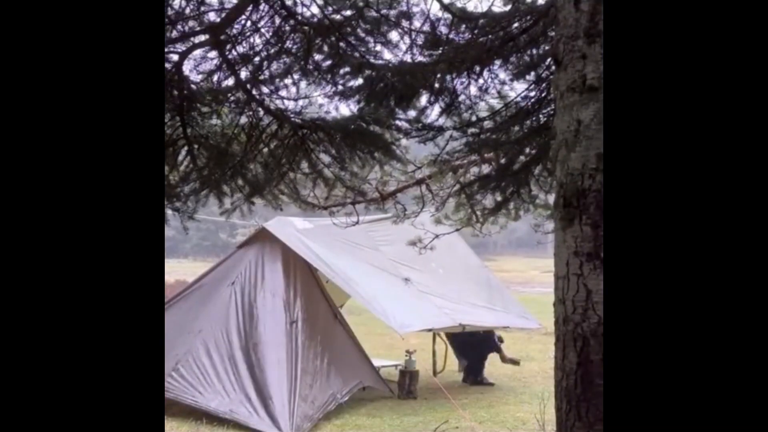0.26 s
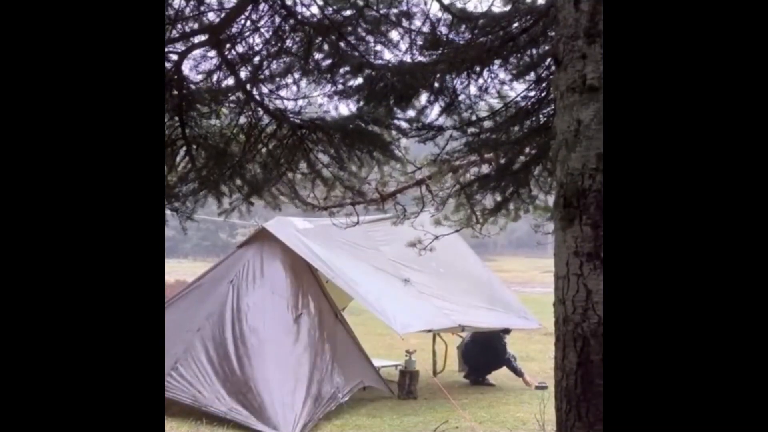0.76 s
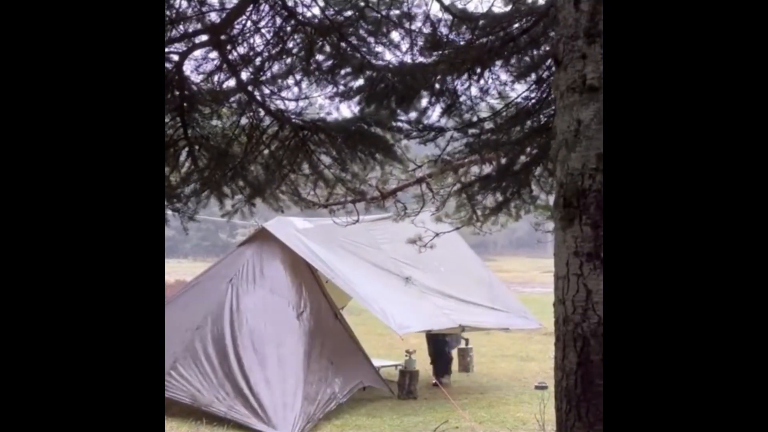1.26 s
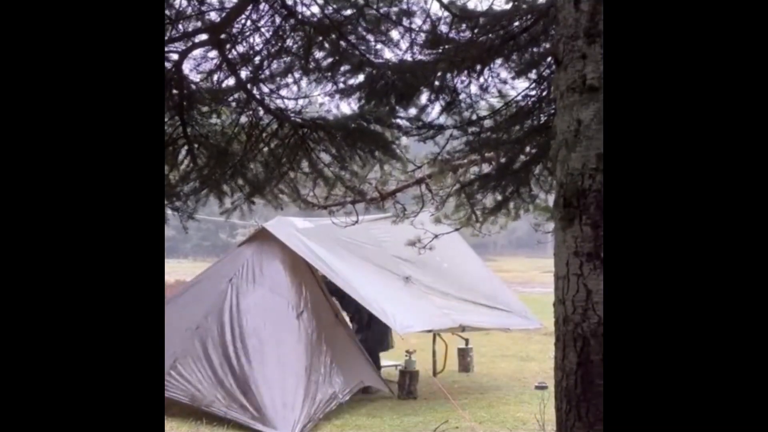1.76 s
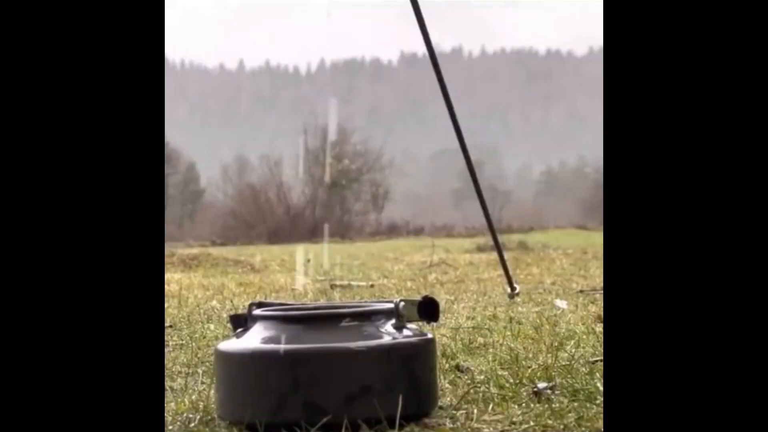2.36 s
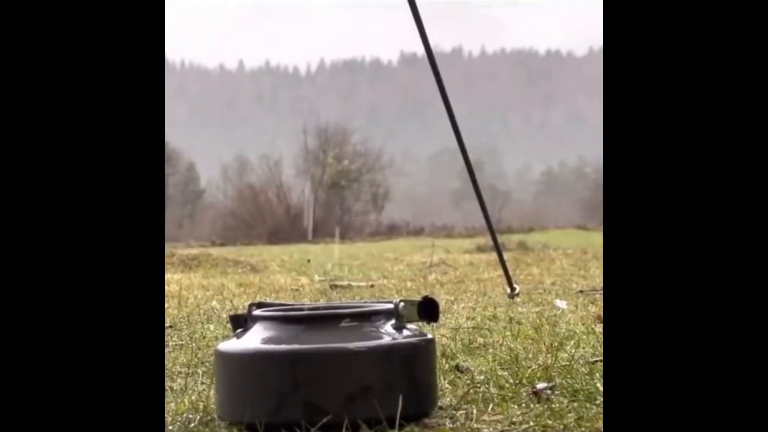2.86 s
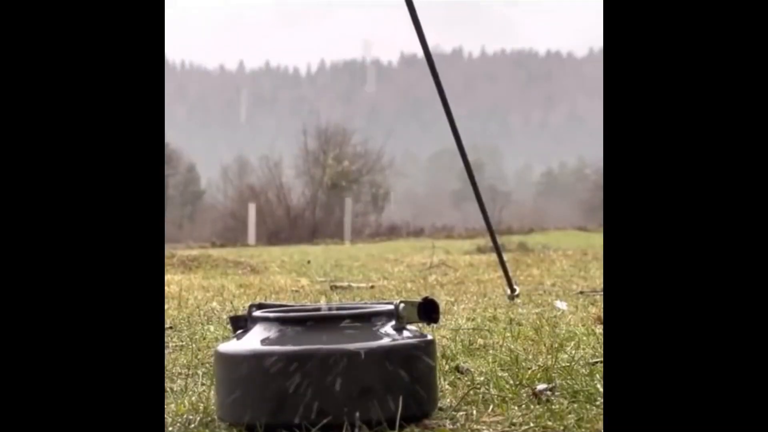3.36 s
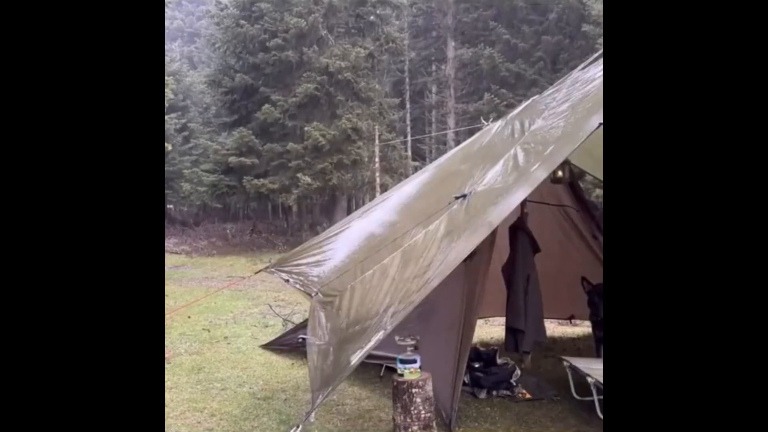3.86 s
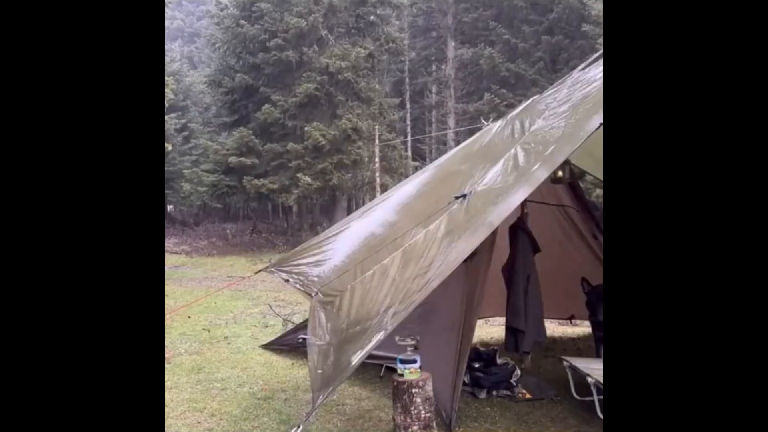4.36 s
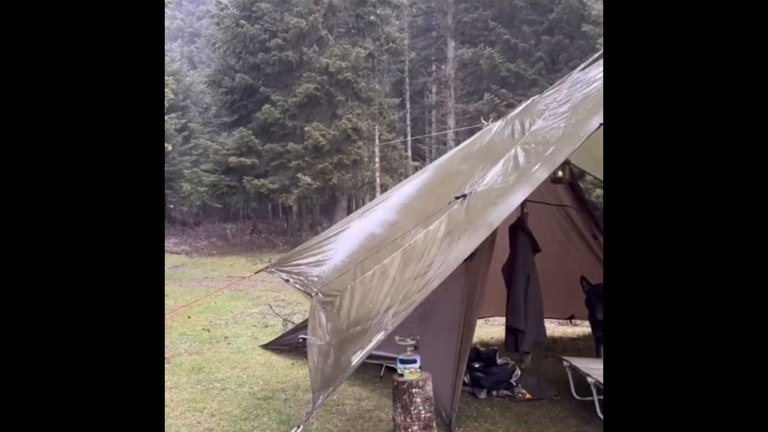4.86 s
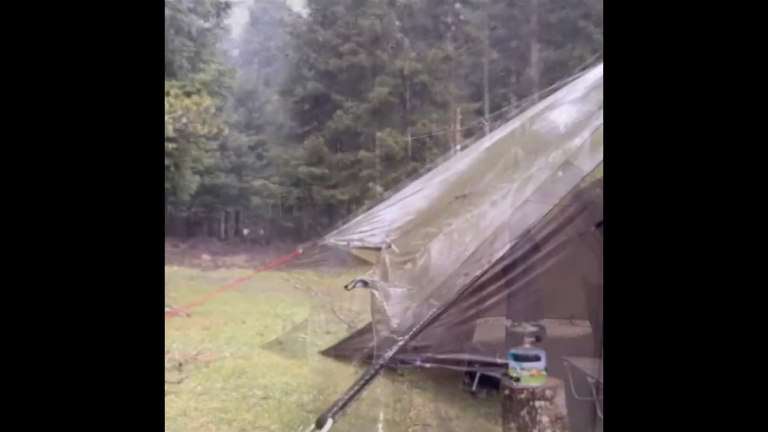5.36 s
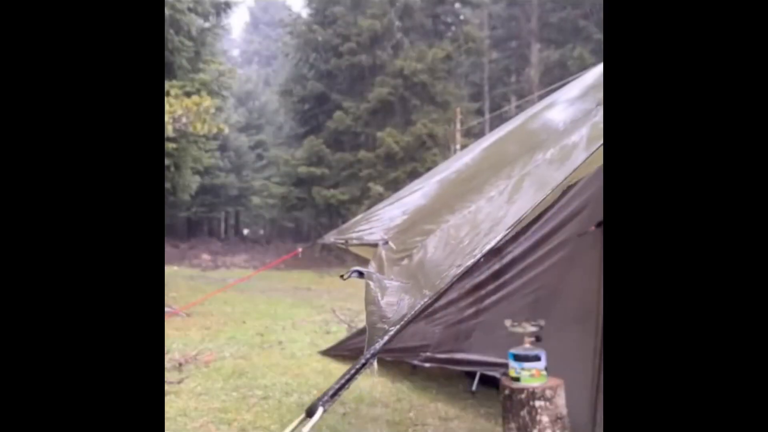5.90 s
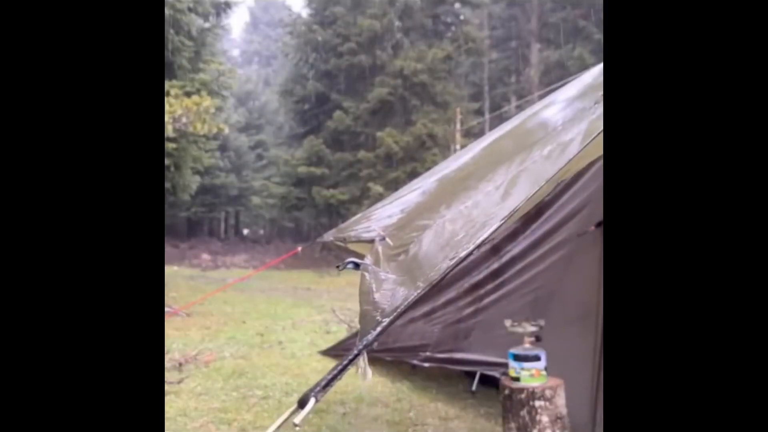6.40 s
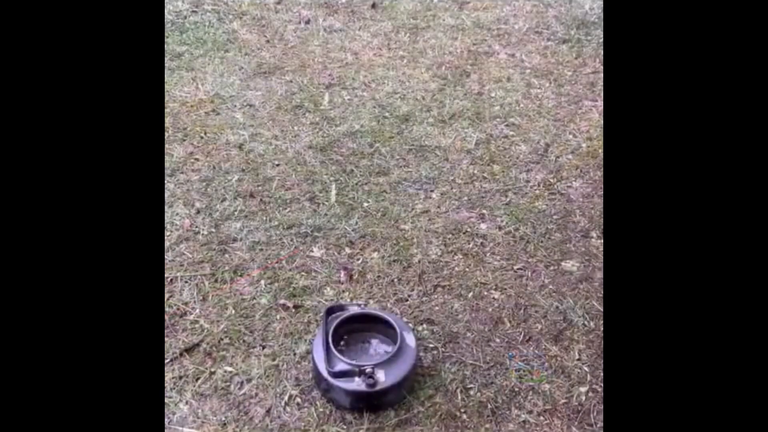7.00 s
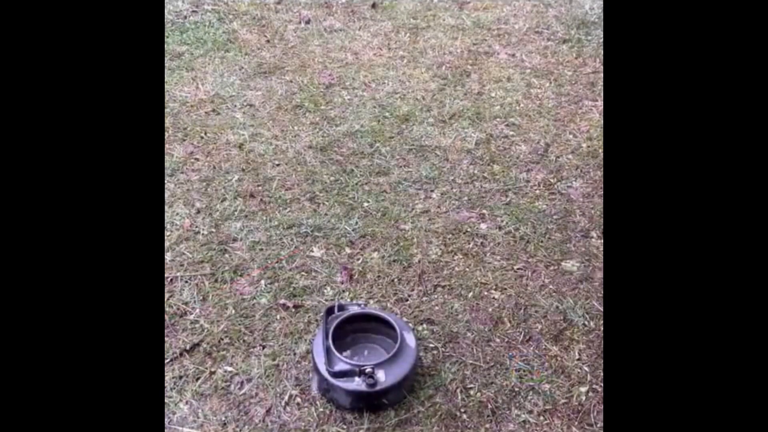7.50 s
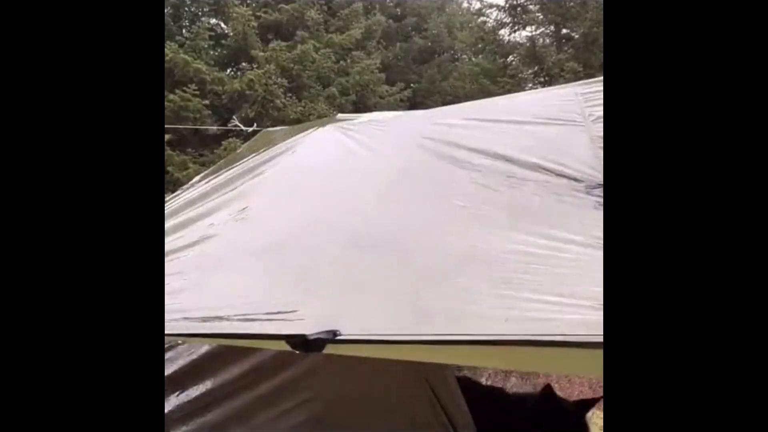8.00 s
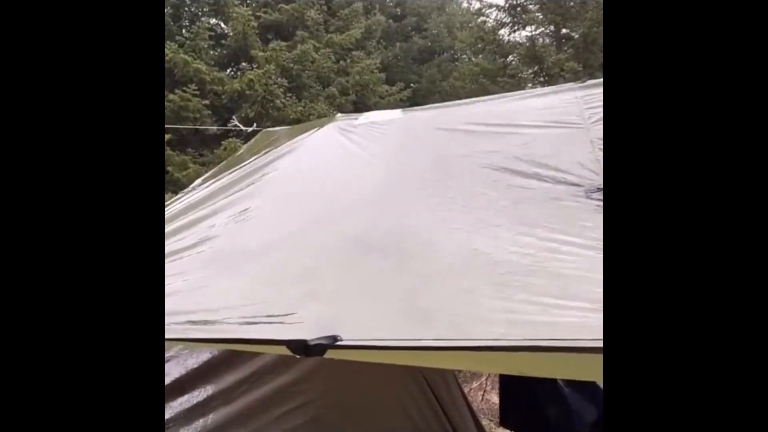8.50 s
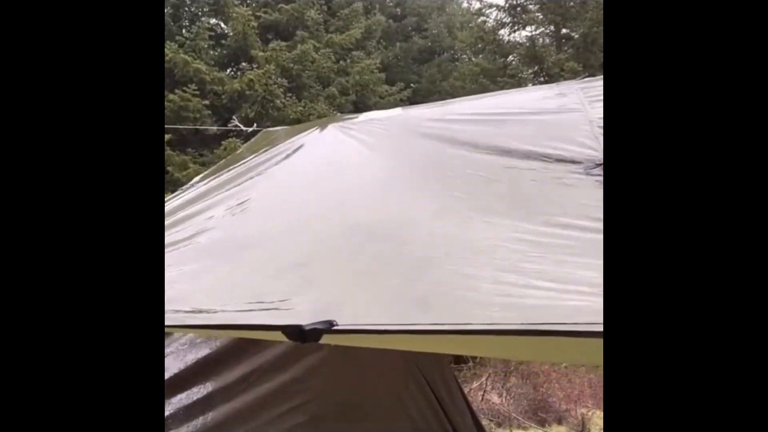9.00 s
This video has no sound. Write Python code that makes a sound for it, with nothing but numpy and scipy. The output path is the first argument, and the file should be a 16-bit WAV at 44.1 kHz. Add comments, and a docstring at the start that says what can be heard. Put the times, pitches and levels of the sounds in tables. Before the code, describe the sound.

Continuous rain in a forest clearing, heard from successive close positions. It starts faint with rapid tiny watery drips, dips further, then blends into brighter rain with short high pings and spits on a kettle. Wide pattering and drumming on a sloping tarp carry snapping big drops and soft thumps, followed by grassy patter, then duller roof drumming with a quick swelling flutter of cloth.

```python
"""Steady rain on a tarp shelter in a forest clearing, heard from one spot after another.
Fine drops hiss and patter, heavier ones drum on the cloth: filtered random clicks over noise.
Big drops snap and tick close by, run-off plinks and spits on a metal kettle: decaying sines and noise.
A thin trickle rings a small hollow early on; later the cloth thumps, and near the end the tarp flaps.
"""
import sys
import numpy as np
from scipy import signal
from scipy.fft import rfft, irfft
from scipy.io import wavfile

SR = 44100
rng = np.random.default_rng(int(sys.argv[2]) if len(sys.argv) > 2 else 0)


def inscribe(sig):
    """Save sig as 16-bit PCM at rate SR to the path in sys.argv[1].

    A 1-D sig is mono; a 2-D sig holds one channel per row.
    Samples are clipped to [-1, 1] before scaling.
    """
    pcm = np.round(np.clip(np.atleast_2d(sig).T, -1, 1) * 32767)
    wavfile.write(sys.argv[1], SR, pcm.astype(np.int16))


N = 407819
TIME = np.arange(N) / SR

# Rain spectrum at each listening spot. Each row: frequency in Hz, relative density in dB per Hz.
TREE = [(35, -57), (60, -37), (188, -18.5), (337, -1), (467, -3.5), (694, -3.5), (2330, -2.5), (3160, -3),
        (4280, -2.5), (5400, -4.5), (9460, -4), (15800, -9.5)]
LULL = [(35, -68.5), (60, -48), (238, -12), (406, -2), (762, -6), (837, -3), (985, -4.5), (1240, -5),
        (1330, -5.5), (6360, -4), (10100, -3), (15800, -5.5)]
KETTLE = [(35, -59), (60, -30), (156, -32), (216, -19.5), (337, -9), (416, -5), (762, -2.5), (897, -3.5),
          (1850, -2.5), (3390, -5), (4490, -7), (5530, -11.5), (9460, -5.5), (14100, -12.5), (15800, -30)]
SLOPE = [(35, -62), (60, -28), (130, -26.5), (243, -11.5), (361, -4.5), (436, -4.5), (550, 0.5),
         (1030, -1.5), (1300, -4), (1940, -0.5), (2750, -3), (3470, -4.5), (6220, -1.5), (11700, -6.5),
         (15800, -13)]
CORNER = [(35, -54), (60, -25.5), (136, -24), (193, -12.5), (397, -2.5), (817, -5), (1220, 0), (2280, -2),
          (2750, -2), (5160, -2.5), (5800, -0.5), (6360, -2.5), (9680, -3.5), (12800, -8.5), (15800, -8.5)]
GRASS = [(35, -60), (60, -46.5), (175, -22.5), (388, -0.5), (678, -5), (940, -2), (1030, -2.5),
         (1460, -2.5), (2130, -6), (2620, -4), (3550, -8), (5660, -3.5), (13700, -8.5), (14700, -11),
         (15800, -8.5)]
ROOF = [(35, -43), (60, -31), (146, -17), (345, 4), (467, 1), (525, 2.5), (762, -4), (877, -6.5),
        (1720, -2.5), (2230, -6), (2620, -4), (4920, -5), (5660, -4), (11400, -8), (15800, -16.5)]
# Stereo width of the rain. Each row: frequency in Hz, side minus mid in dB.
NARROW = [(60, -5), (99, -9), (160, -17), (270, -16), (450, -16), (740, -18), (1220, -39), (2010, -34),
          (3330, -11), (5500, -9.5), (9080, -0.5), (15000, -22)]
OPEN = [(60, -5), (99, -7), (160, -9), (270, -17), (450, -17.5), (740, -16.5), (1220, -19), (2010, -13),
        (3330, -1.5), (5500, -3), (9080, -2), (15000, -1.5)]
WIDE = [(60, -1), (99, -2), (160, -2), (270, -2), (450, -2.5), (740, -8), (1220, -16.5), (2010, -12),
        (3330, -3.5), (5500, -3), (9080, -2), (15000, -0.5)]
CLOSE = [(60, -15), (99, -16), (160, -20), (270, -48), (450, -31), (740, -22), (1220, -15), (2010, -8.5),
         (3330, -5), (5500, -3.5), (9080, -2), (15000, -12)]
# Stretches of steady rain, one spot each. Each row: start in seconds, blend in seconds, dip in the blend
# in dB (below 0 counts as 0), relative patter level in dB, relative drumming level in dB, trend in dB per
# second, spectrum, stereo width, drops per second, spread of drop sizes in dB, hiss against drops in dB,
# heavy drops per second.
SPOTS = [(0, 0.0092, -3, -55, -66, 3.5, TREE, NARROW, 1400, 4.5, 5, 540),
         (1.11, 0.059, 1, -59.5, -76.5, 0, LULL, NARROW, 1400, 6.5, 7.5, 500),
         (1.52, 0.079, 0, -56, -68, -0.5, LULL, NARROW, 2100, 4.5, 2, 520),
         (2.13, .2, 2.5, -45, -59, 0.5, KETTLE, CLOSE, 3800, 2.5, 3, 1200),
         (3.59, .2, 3.5, -43.5, -59.5, 0.5, SLOPE, OPEN, 2600, 3.5, 4, 1250),
         (5.2, .24, 3.5, -41, -55.5, 1.8, CORNER, WIDE, 2500, 3, 3, 450),
         (6.71, .28, 4.5, -45, -57.5, 2.5, GRASS, OPEN, 2100, 4.5, 3.5, 980),
         (7.61, .2, 4.5, -45, -57.5, -3, ROOF, WIDE, 3400, 4.5, 3.5, 520),
         (8.86, 0.088, -3.5, -51, -62, -5, ROOF, WIDE, 2270, 3.5, 3, 500),
         (9.08, .12, 2, -46, -49.5, -2, ROOF, WIDE, 2000, 5, 2.5, 710)]
# Brief swells and dips of the rain. Each row: middle in seconds, time from the middle to 1/e of the change
# in seconds, patter change in dB, drumming change in dB.
SWELLS_AND_DIPS = [(0.783, .1, 2, 3), (0.971, 0.021, 5.5, 5), (1.067, .025, 1.5, 2.5),
                   (1.698, 0.022, 0.5, 5), (2.546, 0.25, 2.5, 2), (5.697, 0.54, 0.5, 2.5),
                   (6.12, 0.19, 0, -0.5), (7.684, 0.048, -3, 2), (7.854, 0.034, 1.5, -1.5)]
# Resonances that tint the rain. Each row: start in seconds, end in seconds, frequency in Hz, width in Hz,
# peak gain in dB.
TINTS = [(2.095, 3.59, 342, 13, 10.5), (3.604, 5.187, 365, 23, 9.5), (2.1, 3.6, 5600, 670, 1),
         (2.1, 3.6, 9600, 4100, 2.5), (3.6, 6.7, 2820, 280, 2.5), (3.6, 5.2, 1300, 100, -0.5),
         (3.6, 5.2, 4100, 650, 2.5), (5.2, 9.25, 5700, 250, 2), (5.2, 9.25, 4280, 330, 3),
         (6.7, 9.25, 2800, 500, 0.5), (7.074, 7.142, 930, 200, 6.5)]
# Big drops close by. Each row: time in seconds, relative level in dB, pitch in Hz, splash T60 in seconds.
TAPS = [(0.569, -47, 2900, 0.0073), (0.738, -33, 2400, 0.011), (.797, -39, 1130, .006),
        (.814, -35, 2290, .007), (.863, -41, 1950, .006), (.933, -34.5, 1760, .008),
        (.9564, -33, 1500, .008), (0.974, -28, 3920, .013), (.9834, -30.5, 4300, 0.011),
        (1.018, -35.5, 2260, .006), (1.05, -32, 1480, 0.0077), (1.053, -32, 2300, .008),
        (1.063, -39, 3400, .007), (1.074, -34, 4370, .007), (1.078, -29, 5500, 0.0092),
        (1.197, -34.5, 9000, 0.01), (1.247, -40, 5000, .007), (1.295, -40, 9000, .007),
        (1.47, -39, 9000, .006), (1.49, -37.5, 2940, .012), (1.658, -36, 7000, .009),
        (1.6885, -32.5, 3230, .013), (1.709, -37, 9000, 0.0065), (2.222, -25, 13500, .008),
        (2.424, -27, 9170, .008), (3.6656, -25, 5040, .007), (4.096, -21.5, 1770, 0.012),
        (4.248, -22, 2160, 0.0089), (4.4807, -25, 4830, .006), (4.5026, -26, 2230, .008),
        (4.5426, -27, 4460, .006), (4.697, -21, 4170, 0.0097), (4.7332, -25, 2120, .007),
        (4.774, -26, 2840, .008), (4.847, -20, 2640, 0.0089), (4.873, -28, 1900, .007),
        (4.902, -23.5, 2670, 0.01), (4.9367, -31, 2700, .007), (4.9922, -25, 5130, 0.0095),
        (5.032, -29, 1400, .007), (5.091, -23, 3040, .007), (5.119, -24, 2050, .006),
        (5.179, -31, 2850, .006), (5.317, -26, 1700, .008), (5.352, -21, 4000, .007),
        (5.394, -20, 5780, .008), (5.84, -19, 6000, .005), (5.922, -24, 10000, .012),
        (5.967, -24, 2400, .007), (6.029, -18.5, 2840, 0.0088), (6.0916, -19.5, 1700, 0.011),
        (6.301, -24, 2800, .008), (6.3505, -26, 4170, .007), (6.399, -23, 6010, .006),
        (6.5814, -28.5, 1280, .008), (7.002, -27, 4320, .007), (7.062, -23.5, 2310, 0.0088),
        (7.2685, -25, 1900, 0.0076), (7.302, -34, 14000, .008), (7.352, -23.5, 1210, 0.017),
        (7.451, -26.5, 1800, 0.018), (7.532, -25.5, 13030, 0.01), (7.645, -24, 2900, 0.01),
        (7.6473, -28, 5000, .01), (7.7005, -26, 4200, .01), (7.993, -23.5, 2100, 0.015),
        (8.020, -26, 1500, .012), (8.1385, -25, 5840, .007), (8.192, -22, 5920, 0.0078),
        (8.266, -33, 5670, .007), (9.135, -30, 3800, .012), (9.142, -35, 1500, .014),
        (9.198, -31, 2400, .01)]
# Run-off on the kettle. Each row: time in seconds, relative level in dB, pitch in Hz, T60 in seconds.
PLINKS = [(2.095, -31, 4670, 0.012), (2.152, -39, 4900, .012), (2.16, -40, 4750, .014),
          (2.1916, -38, 4500, .008), (2.212, -35, 4350, .008), (2.2205, -36, 4700, .01),
          (2.23, -32, 4650, .01), (2.248, -29, 5200, 0.011), (2.288, -37, 4600, .014),
          (2.297, -36, 5000, .012), (2.3067, -28, 4140, .007), (2.314, -39, 5150, .016),
          (2.37, -33, 4150, .01), (2.472, -25.5, 3980, 0.024), (2.483, -34, 4650, .016),
          (2.504, -33, 4400, .008), (2.514, -33, 4600, .009), (2.5287, -30, 3980, .008),
          (2.545, -25, 4500, .011), (2.56, -25, 4500, .012), (2.568, -31, 4400, .012),
          (2.579, -24, 4150, .009), (2.581, -37, 4800, .01), (2.629, -31, 3940, .008),
          (2.63, -29, 4700, 0.012), (2.6835, -36, 4250, .01), (2.7113, -19.5, 4550, 0.0095),
          (2.7114, -30, 6100, .012), (2.7373, -34, 4720, 0.022), (2.775, -26, 4050, .006),
          (2.8072, -37, 4730, .014), (2.947, -43, 4730, .016), (3.0377, -32, 4300, .008),
          (3.129, -33, 4700, 0.016), (3.1488, -27, 4680, .009), (3.1613, -25, 4970, .014),
          (3.192, -31, 4150, .008), (3.2055, -22, 4450, 0.01), (3.3564, -23, 4430, .022),
          (3.393, -37, 5100, .014), (3.4626, -30, 4460, 0.012), (3.52, -29, 4540, 0.011)]
# While the sloping wall of the tarp is near. Each row: start in seconds, end in seconds.
TICK_SPANS = [(3.7, 5.13), (5.3, 6.62)]
# Dull blows on the taut cloth. Each row: time in seconds, relative level in dB, pitch in Hz.
THUMPS = [(5.324, -41.5, 307), (5.332, -40, 430), (5.423, -42, 360), (5.5, -41, 363), (5.538, -42, 436),
          (5.646, -41, 470), (5.68, -43, 295), (5.706, -42, 400), (5.877, -40, 480), (5.886, -42, 300),
          (6.17, -38, 523), (6.21, -37.5, 480), (6.408, -44.5, 347), (7.656, -40, 616), (7.727, -35, 590),
          (7.834, -34, 770), (7.846, -31, 810), (7.85, -33.5, 453), (8.101, -32.5, 352),
          (8.103, -37.5, 840), (8.6766, -36, 370), (8.731, -35, 615), (8.747, -38, 755), (8.766, -36, 420),
          (8.781, -35, 804), (8.8105, -27, 630), (8.812, -42, 1040), (8.829, -26, 457), (8.83, -30, 940),
          (9.04, -38, 320), (9.071, -41, 380), (9.102, -41, 400), (9.1434, -25, 344), (9.196, -38, 480),
          (9.221, -35, 360)]
# Spectrum of the flapping folds. Each row: frequency in Hz, relative density in dB per Hz.
FLAP_COLOUR = [(60, -13), (150, -13.5), (300, 4), (550, 4), (850, -3), (1150, -9.5), (1700, -21),
               (4000, -35)]
# Drips of the thin trickle. Each row: time in seconds, relative level in dB.
TRICKLE = [(.238, -50), (.249, -53), (.268, -43), (0.275, -43), (.304, -46), (.311, -45), (.3255, -42),
           (.332, -44), (.34, -43), (.356, -44), (.371, -43), (.382, -46), (.395, -45), (.403, -48),
           (.425, -48), (.4355, -41), (.459, -48), (0.468, -47), (.482, -53), (.525, -48), (.553, -47),
           (.5675, -43), (.582, -44), (.598, -44), (.615, -46), (0.639, -49.5), (.656, -50), (.701, -46),
           (.746, -46), (1.095, -46), (1.113, -51)]
# Modes of the hollow. Each row: pitch ratio, relative level in dB, T60 in seconds.
TRICKLE_MODES = [(1, -4, 0.05), (1.07, -5, .026), (1.14, -9, 0.022), (1.22, -6, 0.02), (1.75, -9, .018)]

CUTOFF_HZ = 15900
RUMBLE_DB = -31.5  # open air, against the drumming
# The tarp is drawn tight, holds, then is let go.
FLAP_START_S, FLAP_SWELL_S, FLAP_END_S, FLAP_RELEASE_S = 8.65, 0.093, 8.84, 0.018
FLAP_DB = -44  # before the brightening
# The hollow fills, so its pitch sinks and settles.
HOLLOW_START_HZ, HOLLOW_END_HZ, HOLLOW_FILL_S = 3150, 2870, 0.13
HOLLOW_SLOSH = 0.01  # random spread of each mode's pitch at each drip, as a share


def rain(patter_db=-0.5, drumming_db=0.55, flutter_db=0.82):
    """Patter, drumming and rumble: each spot holds or follows a slow trend, then blends into the next."""
    patter, drumming = np.zeros((2, 2, N))
    air_power = np.zeros(N)
    past_end = (N / SR + .5, .5, 0)
    for spot, following in zip(SPOTS, SPOTS[1:] + [past_end]):
        start_s, blend_s, dip_db, fine_db, heavy_db, trend_db_per_s = spot[:6]
        next_s, next_blend_s, next_dip_db = following[:3]
        fade_in = blend(TIME - start_s, blend_s, dip_db)
        fade_out = blend(next_s - TIME, next_blend_s, next_dip_db)
        gain = fade_in * fade_out
        here = np.flatnonzero(gain)
        trend_db = trend_db_per_s * (TIME[here] - TIME[here].mean())
        gain = gain[here] * from_db(trend_db)
        fine, heavy = rain_at_spot(len(here), *spot[6:])
        patter[:, here] += fine * gain * from_db(fine_db)
        drumming[:, here] += heavy * gain * from_db(heavy_db)
        air_power[here] += (gain * from_db(heavy_db + RUMBLE_DB)) ** 2
    fine_gain, heavy_gain = swells_and_dips()
    patter *= fine_gain * from_db(patter_db + flutter_db * drift(N, 35))
    drumming *= heavy_gain * from_db(drumming_db)
    return patter + drumming + rumble() * np.sqrt(air_power)


def rain_at_spot(count, spectrum, width, per_s, spread_db, hiss_db, heavy_per_s,
                 split_hz=900, heavy_spread_db=3.0, wash_db=-3, droplet_db=-7.5):
    """Bright patter and dull drumming, each made of near drops over the blur of far ones."""
    fine = shower(count, per_s, spread_db, np.geomspace(700, 14000, num=5), reach=3.4, clump_db=1.5)
    hiss = rng.standard_normal((2, count))
    fine = fine + from_db(hiss_db) * hiss + from_db(droplet_db) * droplets(count)

    heavy_hz = np.geomspace(170, 1400, num=4)
    heavy = shower(count, heavy_per_s, heavy_spread_db, heavy_hz, reach=1.87, clump_db=1.75)
    wash = np.array([rms_one(band(rng.standard_normal(count), 22, 1500)) for _ in range(2)])
    heavy = heavy + from_db(wash_db) * wash

    layers = []
    for mid, side in (band(fine, split_hz, 25000, order=3), band(heavy, 34, split_hz, order=3)):
        mid, side = colour(mid, spectrum), colour(side, spectrum)
        layers.append(rms_one(stereo(mid, colour(side, width))))
    return layers


def shower(count, per_s, spread_db, pitches_hz, reach, clump_db, splash_s=0.001, splash_share=0.44):
    """Mid and side of drops that arrive in clumps, each with a broad pitch, brief splash and direction."""
    out, t = np.zeros((2, count)), TIME[:SR // 200]
    clumps = from_db(clump_db * drift(count, 45))
    decay = np.exp(-t / splash_s) / (splash_s * SR)
    for hz in pitches_hz:
        hits = impacts(count, clumps * per_s / len(pitches_hz), spread_db, largest=4.57)
        splash_power = signal.fftconvolve(hits ** 2, decay)[:count]
        splash = np.sqrt(np.abs(splash_power)) * rng.standard_normal((2, count))
        near = np.array([hits, hits * rng.uniform(-1.7, 2.05, count)])
        drops = np.sqrt(1 - splash_share) * near + np.sqrt(splash_share) * splash
        out += band(drops, hz / reach, hz * reach)
    return np.array([rms_one(row) for row in out])


def droplets(count, per_s=450, spread_db=2.5, cycles=50):
    """Mid and side of drops ringing in wet grass and puddles: two-pole resonators struck by clicks."""
    out = np.zeros((2, count))
    for hz in np.geomspace(700, 14000, num=30) * rng.uniform(.96, 1.04, 30):
        radius = from_db(-60 * hz / (cycles * SR))  # 60 dB down after the given cycles
        angle = 2 * np.pi * hz / SR
        hits = impacts(count, per_s / 30, spread_db, largest=4.1) + 1e-18
        poles = [1, -2 * radius * np.cos(angle), radius * radius]
        ping = signal.lfilter([0, np.sin(angle)], poles, hits)
        direction = np.array([[1], [rng.choice([-1, 1]) * 1.06]])
        out += rms_one(ping) * np.sqrt(hz) * direction
    return out / np.std(out[0])


def impacts(count, per_s, spread_db, largest=5.2):
    """Random clicks of either sign, many small and a few large; size in dB is exponential, capped."""
    luck = rng.uniform(-1, 1, count) * SR / np.maximum(per_s, 1)
    hit, out = np.abs(luck) < 1, np.zeros(count)
    size = np.minimum(-np.log(np.abs(luck[hit])), largest)
    out[hit] = np.sign(luck[hit]) * from_db(spread_db * size)
    return out


def swells_and_dips():
    """Gains of patter and drumming: each one rises or sinks and returns as a bell curve in dB."""
    change_db = np.zeros((2, N))
    for middle_s, half_s, *peaks_db in SWELLS_AND_DIPS:
        change_db += np.outer(peaks_db, np.exp(-((TIME - middle_s) / half_s) ** 2))
    return from_db(change_db)


def tinted(x):
    """Resonances lift or lower narrow parts of the rain for a while."""
    out = x.copy()
    for start_s, end_s, hz, width_hz, db in TINTS:
        stretch = x * (TIME > start_s) * (TIME < end_s)
        b, a = signal.iirpeak(hz, hz / width_hz, fs=SR)
        out += (from_db(db) - 1) * signal.lfilter(b, a, stretch)
    return out


def ticks(per_s=190, level_db=-39, spread_db=1.5, t60_s=0.0051, low_hz=1700, high_hz=7000, pan_db=2.0):
    """Single drops on the taut wall: each rings very briefly at the pitch of the place where it lands."""
    out, t = np.zeros((2, N)), TIME[:SR // 50]
    for start_s, end_s in TICK_SPANS:
        drops = rng.random((1000, 5))[:round(per_s * (end_s - start_s))]
        for when, size, place, damping, across in drops:
            hz = low_hz * (high_hz / low_hz) ** place
            db = level_db + spread_db * min(-np.log(1 - size), 3.5)
            drop_t60_s = t60_s * (.5 + damping)
            ring = np.sin(2 * np.pi * hz * t) * from_db(db - 60 * t / drop_t60_s)
            pan = from_db(pan_db * (2 * across - 1) * np.array([[1], [-1]]))
            add(out, start_s + when * (end_s - start_s), ring * pan)
    return band(out, 880, 20000, order=2)


def taps(level_db=-0.5, cycles=10, snap_db=-7, splash_db=-4, splash_hz=8500, rise_s=.00022):
    """A big drop flattens into a short snap inside a broad splash; it is too small to radiate bass."""
    out, t = np.zeros((2, N)), TIME[:SR // 30]
    rise = 1 - np.exp(-t / rise_s)
    for s, db, hz, splash_t60_s in TAPS:
        snap = np.sin(2 * np.pi * hz * t) * from_db(snap_db - 60 * t * hz / cycles)
        noise = band(rng.standard_normal((2, len(t))), 960, max(splash_hz, hz))
        mid, side = noise * from_db(splash_db - 60 * t / splash_t60_s)
        splash = stereo(mid, band(side, 7600, 18000))
        add(out, s - rise_s, from_db(db + level_db) * rise * (snap + splash))
    return band(out, 730, 18000, order=3)


def kettle(level_db=-3, lower=0.9, lower_db=-10, partner=1.5, partner_db=-20, overtone=2.15,
           overtone_db=-13, splash_db=-16, splash_t60_s=0.011, small_db=-33.5, small_t60_s=0.0082):
    """Each drip gives a short ping with three weak modes and a little spray; small drips fall between."""
    out, t = np.zeros((2, N)), TIME[:SR // 20]
    # time in seconds, relative level in dB, pitch in Hz
    lowest = [PLINKS[1][0], small_db - 7.5, 3950]
    highest = [PLINKS[-1][0], small_db, 4850]
    small = rng.uniform(lowest, highest, size=(190, 3))
    modes = [(1, 0), (lower, lower_db), (partner, partner_db), (overtone, overtone_db)]
    for s, db, hz, t60_s in PLINKS + [(*drip, small_t60_s) for drip in small]:
        ping = sum(from_db(mode_db) * np.sin(2 * np.pi * ratio * hz * t) for ratio, mode_db in modes)
        ping = ping * from_db(-60 * t / t60_s)
        noise = band(rng.standard_normal(len(t)), 3000, 15000)
        splash = noise * from_db(splash_db - 60 * t / splash_t60_s)
        add(out, s, from_db(db + level_db) * (ping + splash))
    return band(out, 3400, 22000, order=2)


def spray(per_s=70, spread_db=3.5, level_db=-54, hz=13000, fade_db_per_s=7):
    """Run-off bursts on the kettle into tiny, very bright spits of noise, strongest as it begins."""
    t = TIME[:SR // 200]
    first_s, last_s = PLINKS[0][0], PLINKS[-1][0]
    running = (TIME > first_s) * (TIME < last_s)
    spits = impacts(N, per_s, spread_db, largest=4.4) ** 2 * running
    burst = np.sqrt(np.abs(signal.fftconvolve(spits, np.hanning(len(t)))[:N]))
    fade_db = fade_db_per_s * np.maximum(TIME - first_s, 0)
    noise = rms_one(band(rng.standard_normal(N), hz / 1.17, hz * 1.23, order=2))
    return from_db(level_db - fade_db) * burst * noise


def thumps(level_db=-1, rise_cycles=0.9, lag_cycles=0.084, slap_db=2, slap_t60_s=0.03, slap_hz=1500):
    """The wet cloth swings up within a cycle and dies in a rough slap; its two sides swing out of step."""
    out, t = np.zeros((2, N)), TIME[:SR // 15]
    for s, db, hz in THUMPS:
        age = t * hz / rise_cycles
        lag = lag_cycles * np.array([[1], [-1]]) * rng.choice([-1, 1])
        swing = np.sin(2 * np.pi * (hz * t + lag)) * (age * np.exp(1 - age)) ** 2
        noise = rng.standard_normal((2, len(t))) * from_db(slap_db - 60 * t / slap_t60_s)
        mid, side = band(noise, 320, slap_hz, order=2)
        add(out, s, (swing + stereo(mid, side / 2)) * from_db(db + level_db))
    return band(out, 200, 5030, order=2)


def flap(per_s=900, spread_db=0.5, side_db=-0.5, bright_db=8, bright_hz=1050, lowest_hz=90):
    """Folds pop in a quick swelling run, brighter as the tarp tightens."""
    pops = [colour(impacts(N, per_s, spread_db), FLAP_COLOUR) for _ in range(2)]
    mid, side = [rms_one(band(x, lowest_hz, 20000)) for x in pops]
    folds = stereo(mid, from_db(side_db) * side)
    rise = (TIME - FLAP_START_S) / FLAP_SWELL_S
    release = (FLAP_END_S - TIME) / FLAP_RELEASE_S
    swell = np.clip(np.minimum(rise, release), 0, 1)
    tension = np.clip((TIME - FLAP_START_S) / (FLAP_END_S - FLAP_START_S), 0, 1)
    bright = from_db(bright_db) * tension ** 2 * band(folds, bright_hz, 5000, order=2)
    return (folds + bright) * from_db(FLAP_DB) * swell ** 2


def trickle(level_db=-2):
    """A thread of water breaks into a quick run of drips that ring a small hollow, whose pitch sinks."""
    out, t = np.zeros(N), TIME[:SR // 25]
    for s, db in TRICKLE:
        unfilled = np.exp(-(s - TRICKLE[0][0]) / HOLLOW_FILL_S)
        hz = HOLLOW_END_HZ + (HOLLOW_START_HZ - HOLLOW_END_HZ) * unfilled
        for ratio, mode_db, t60_s in TRICKLE_MODES:
            mode_hz = hz * ratio * (1 + HOLLOW_SLOSH * rng.normal())
            ring = np.sin(2 * np.pi * (mode_hz * t + rng.random()))
            add(out, s, ring * from_db(level_db + db + mode_db - 60 * t / t60_s))
    return band(out, 2840, 6300, order=2)


def rumble(side_db=-3, top_hz=130):
    """Moving air: low noise, partly different at each ear."""
    mid, side = band(rng.standard_normal((2, N)), 5.8, top_hz, order=2)
    return rms_one(stereo(mid, from_db(side_db) * side))


def drift(count, rate_hz):
    """Smooth chance with rms 1: straight lines between random knots."""
    knots = rng.standard_normal(2000)
    return rms_one(np.interp(np.arange(count) / SR * rate_hz, np.arange(len(knots)), knots))


def blend(into_s, blend_s, dip_db):
    """Fade gain, half way at into_s = 0; two opposite fades of noise sag by dip_db where they meet."""
    power = .5 + max(dip_db, 0) / (20 * np.log10(2))
    return np.clip(into_s / blend_s + .5, 0, 1) ** power


def colour(x, points):
    """Causal (minimum-phase) filter that follows a spectrum of (Hz, dB) points."""
    size = 4096
    hz, db = np.transpose(points)
    grid_hz = np.maximum(np.arange(size // 2 + 1) * SR / size, 1)
    grid_db = np.interp(np.log(grid_hz), np.log(hz), db)
    cepstrum = irfft(np.log(from_db(grid_db)))
    # folding the cepstrum onto positive time makes the phase minimal
    cepstrum[1:size // 2] *= 2
    cepstrum[size // 2 + 1:] = 0
    response = irfft(np.exp(rfft(cepstrum)))
    return signal.fftconvolve(x, response)[:len(x)]


def band(x, low_hz, high_hz, order=1):
    """Butterworth band-pass."""
    edges_hz = [low_hz, min(high_hz, .48 * SR)]
    sos = signal.butter(order, edges_hz, "band", fs=SR, output="sos")
    return signal.sosfilt(sos, x + 1e-18)


def from_db(db):
    """Amplitude factor of a level in dB."""
    return 10 ** (np.asarray(db) / 20)


def rms_one(x):
    """Scale so that the signal, or the mean of its two channels, has rms 1."""
    return x / np.sqrt(np.mean(np.atleast_2d(x).mean(axis=0) ** 2) + 1e-20)


def stereo(mid, side):
    """Left and right from mid and side."""
    return np.array([mid + side, mid - side])


def add(out, s, sound):
    """Mix a short sound in at s seconds."""
    start = max(round(s * SR), 0)
    out[..., start:start + sound.shape[-1]] += sound[..., :N - start]


def scene():
    """Rain all round, with single drops and the cloth in front."""
    return tinted(rain() + ticks()) + kettle() + spray() + taps() + thumps() + flap() + trickle()


def record(dry):
    """Steep elliptic low-pass: the top is cut."""
    return signal.sosfilt(signal.ellip(12, .1, 80, CUTOFF_HZ, fs=SR, output="sos"), dry)


dry = scene()
out = record(dry)
inscribe(out)
```